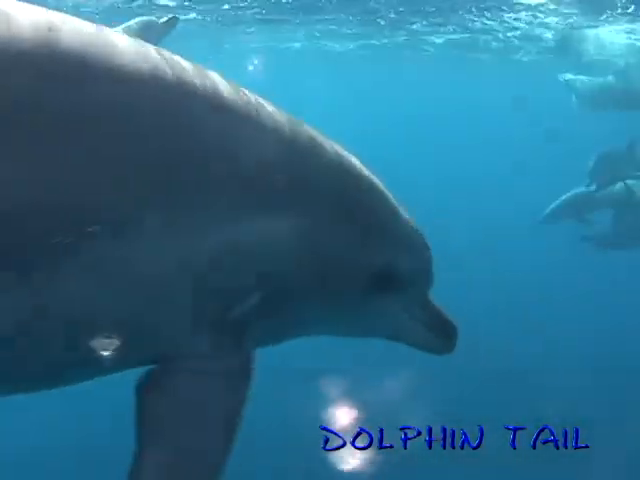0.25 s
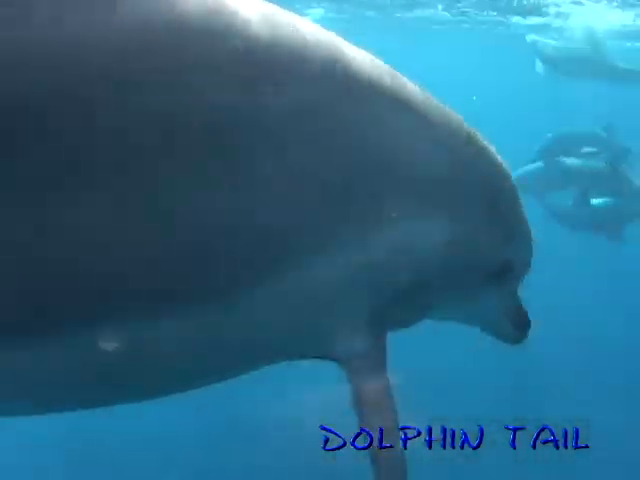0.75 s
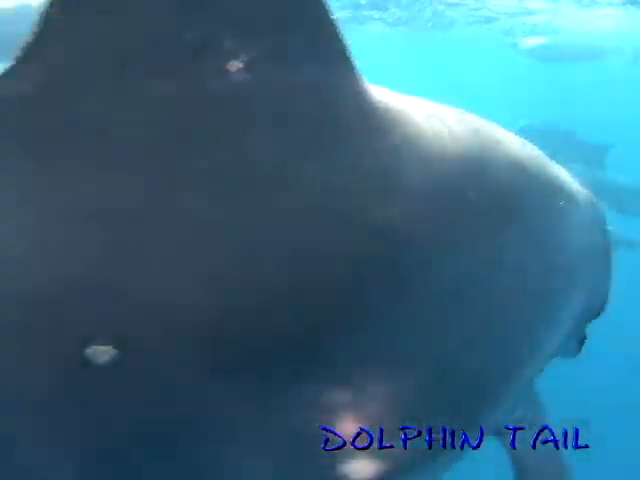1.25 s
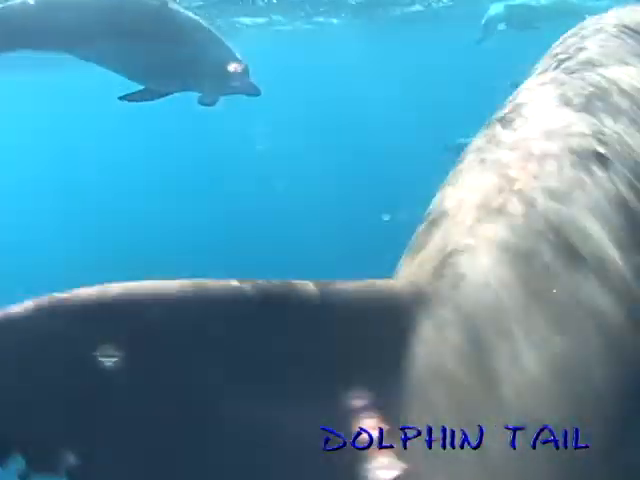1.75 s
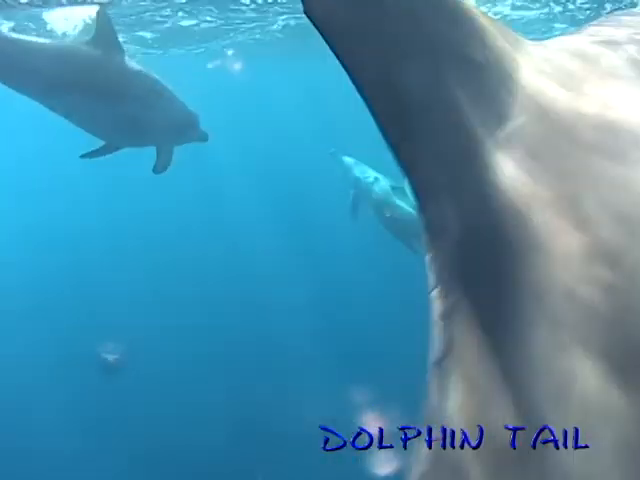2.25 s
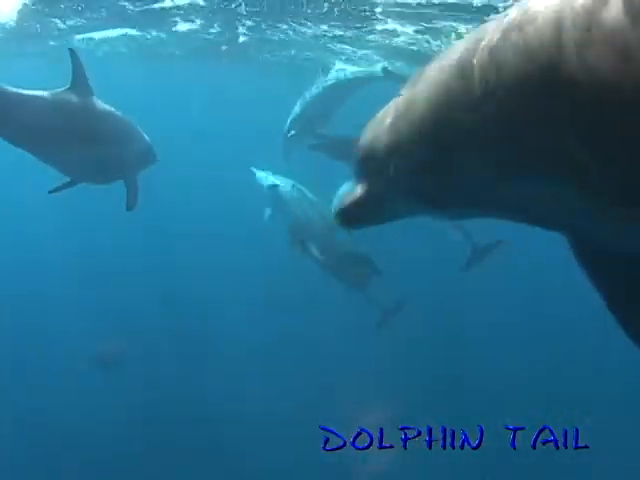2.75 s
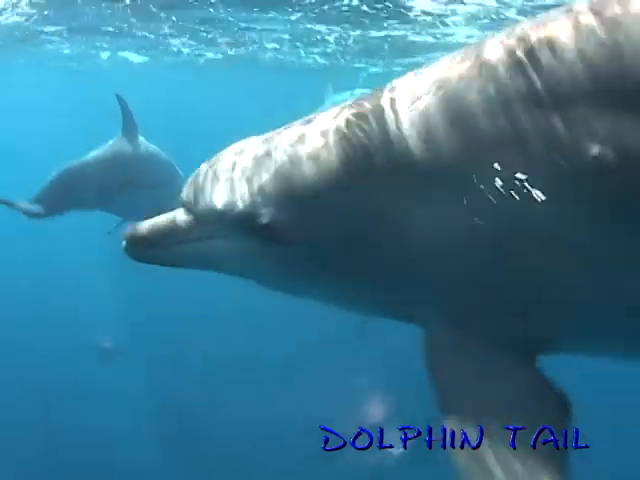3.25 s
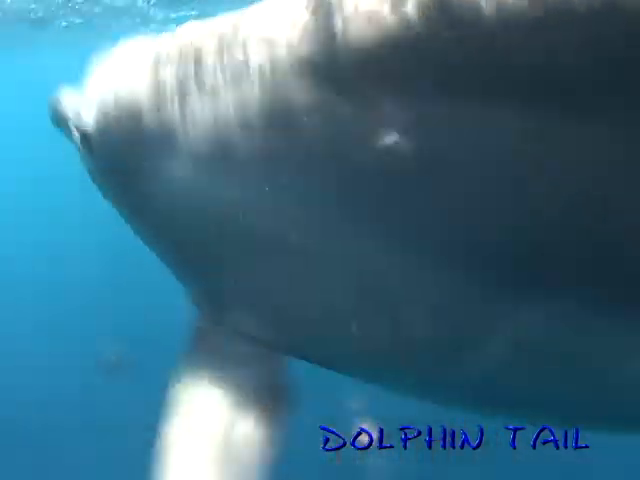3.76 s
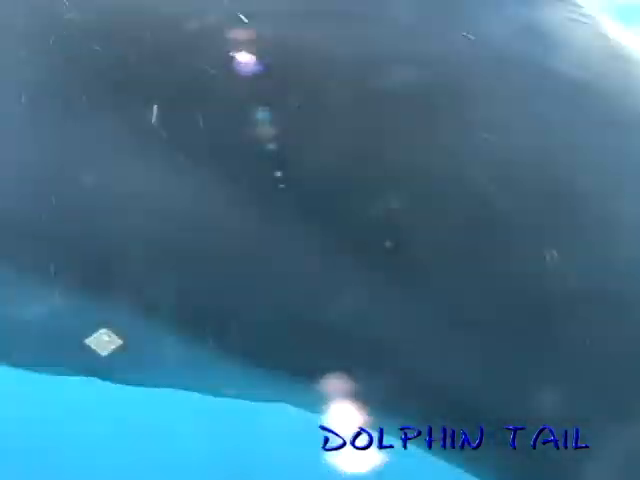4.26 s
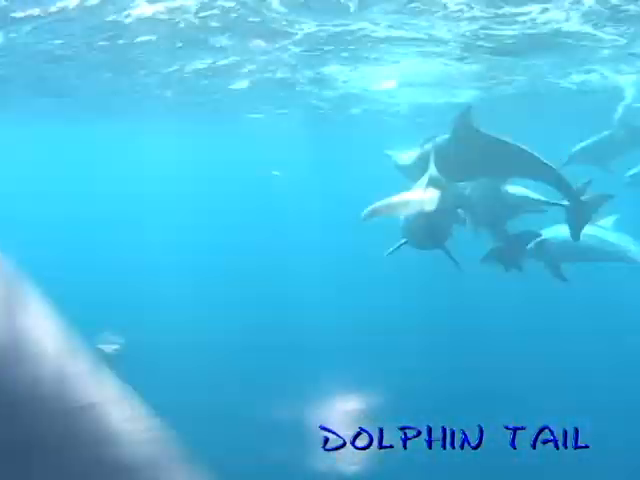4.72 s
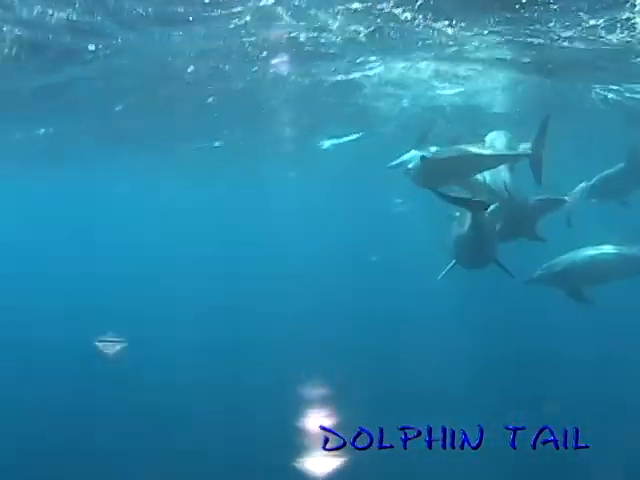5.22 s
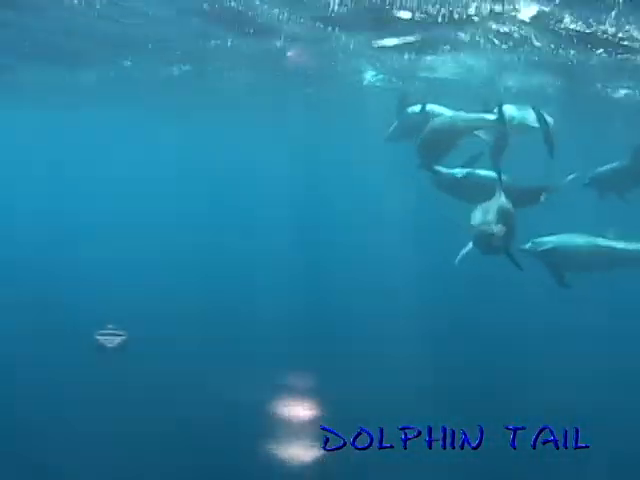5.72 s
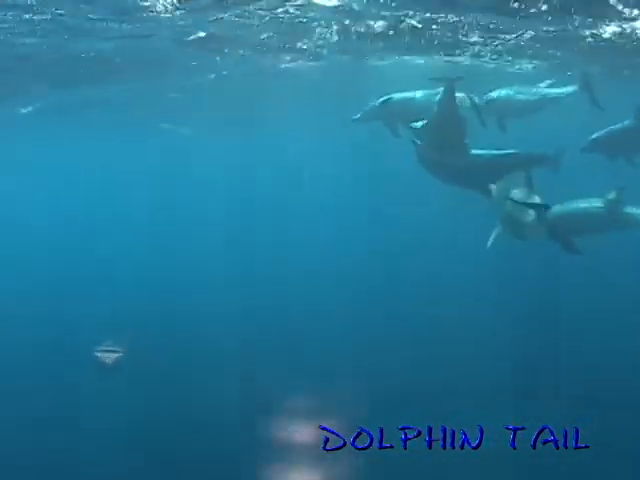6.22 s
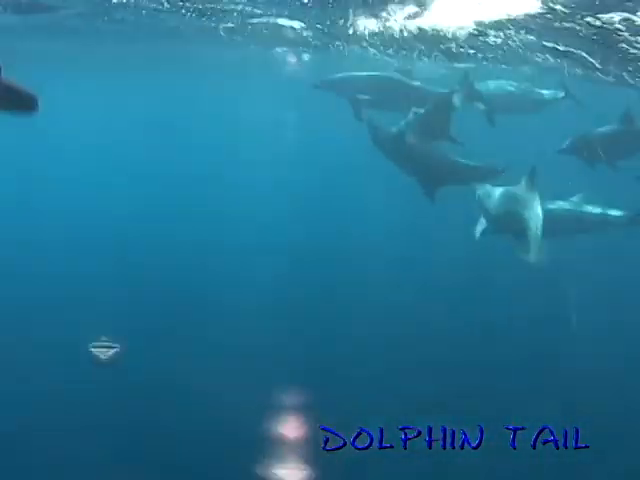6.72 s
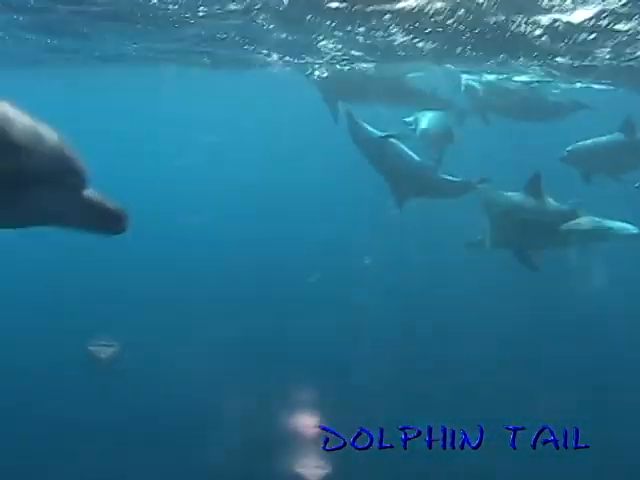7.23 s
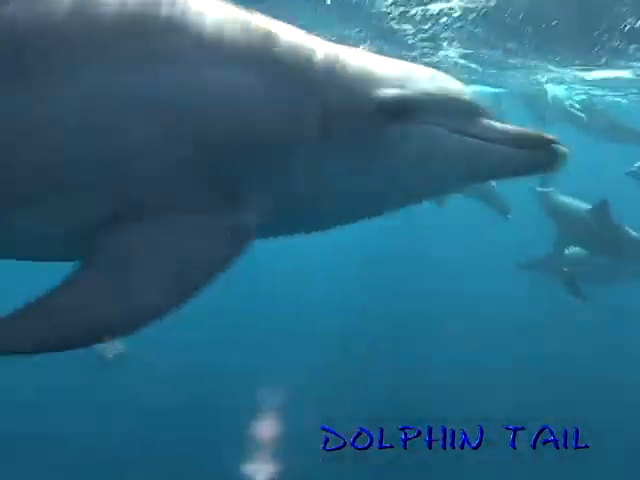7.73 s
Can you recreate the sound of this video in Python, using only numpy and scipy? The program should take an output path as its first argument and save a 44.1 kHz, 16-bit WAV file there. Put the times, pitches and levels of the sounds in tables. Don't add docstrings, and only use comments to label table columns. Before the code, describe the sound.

High looping dolphin whistles swoop up and down through hissing sea water, joined by sonar clicks, bubble pops, dull knocks and a brief squawking cluster.

```python
import sys
import numpy as np
from scipy import signal
from scipy.fft import rfft, irfft
from scipy.io import wavfile
from scipy.ndimage import uniform_filter1d

SR = 44100
rng = np.random.default_rng(int(sys.argv[2]) if len(sys.argv) > 2 else 0)


def to_wav(s):
    ch = np.atleast_2d(s).T
    pcm = np.round(np.clip(ch, -1, 1) * 32767)
    wavfile.write(sys.argv[1], SR, pcm.astype(np.int16))


def voltage_ratio(decibels):
    exponent = np.asarray(decibels, float) / 20
    return 10 ** exponent


N = 351915

# (frequency [Hz], gain [dB])
WALL_LEFT = [(3960, 5.5), (4440, 4.5), (5280, -16.5), (5640, -4), (6360, -7), (7200, -7), (7800, -17),
             (8040, -16.5), (8880, -23.5), (9600, -19), (11760, -36.5), (14760, -36.5), (15600, -44),
             (15720, -31)]
WALL_RIGHT = [(3960, -2.5), (4200, 0), (4920, -13), (5520, -9.5), (5880, -7.5), (6600, -9.5), (8040, -15),
              (8760, -29), (10560, -27.5), (13080, -40), (14760, -31), (15480, -47), (15600, -53),
              (15720, -30)]
# (frequency [Hz], left over right [dB])
BALANCE_DB = [(60, 12.5), (110, -2.5), (200, 1), (380, -0.5), (700, -0.5), (1290, -5.5), (2380, -1.5),
              (4400, -0.5), (8120, -1.5), (15000, 1)]
# (time [s], hold [s], hollow rush level [dB], broad wash level [dB], release [dB/s])
WAKES = [
    (0, 0.046, -43, -39.5, 16.5),
    (2.126, 0.16, -43.5, -38.5, 20.5),
    (3.31, 0.83, -57.5, -41.5, 11),
    (4.326, 0.98, -50.5, -40.5, 33),
    (6.293, 0.29, -54, -38, 21),
    (7.474, 0.1, -50, -33, 41),
]
# (breathy halo [dB], surface echo delay [ms], echo level [dB])
FALL_PATH = (-7, 1.8, -10)


def rms_one(x):
    return x / np.sqrt(np.mean(x ** 2) + 1e-20)


def span(s, length_s):
    at = np.arange(round(s * SR), min(round((s + length_s) * SR), N))
    return at, (at - at[0]) / SR


def in_time(rows):
    s, *columns = np.transpose(rows)
    at = np.arange(round(s[0] * SR), min(round(s[-1] * SR), N))
    return [at] + [np.interp(at / SR, s, c) for c in columns]


def at_hz(points, hz):
    points_hz, value = np.transpose(points)
    return np.interp(np.log(hz + 1), np.log(points_hz), value)


def drift(rate_hz):
    r = np.exp(-80 * np.pi * rate_hz / SR)
    white = rng.standard_normal(N // 40 + 2002)
    slow = signal.lfilter([1], [1, -2 * r, r * r], white)[2000:]
    return np.interp(np.arange(N) / 40, np.arange(len(slow)), rms_one(slow))


def resonate(x, hz, width_hz):
    r = np.exp(-np.pi * width_hz / SR)
    poles = [1, -2 * r * np.cos(2 * np.pi * hz / SR), r * r]
    return signal.lfilter([(1 - r * r) / 2, 0, (r * r - 1) / 2], poles, x)


def panned(x, pan_db):
    return x * voltage_ratio(np.array([[pan_db / 2], [-pan_db / 2]]))


def causal(db):
    cepstrum = irfft(db * np.log(10) / 20)
    cepstrum[1:len(db) - 1] *= 2
    cepstrum[len(db):] = 0
    return irfft(np.exp(rfft(cepstrum)))


def sea_colour_db(hz):
    # (frequency [Hz], density [dB/Hz])
    hiss = [(15, -61), (25, -34.5), (148, -21.5), (435, -2.5), (569, -8), (1030, -2), (1120, -5.5),
            (1540, -1.5), (2070, -4), (2720, -0.5), (3860, -9), (6100, -9.5), (8650, -7), (11000, -19.5),
            (15600, -22.5)]
    # (frequency [Hz], width [Hz], level over the hiss [dB])
    hollows = [(215, 270, 0.5), (572, 46, 9.5), (640, 110, 3.5), (700, 244, 6), (1000, 78, 3),
               (1540, 94, 5.5), (2480, 160, 1), (2840, 120, 5), (4410, 540, 4.5), (6100, 1130, 3.5),
               (9300, 2100, -11), (10730, 660, 8.5)]
    bumps = sum(db / (1 + (2 * (hz - centre_hz) / width_hz) ** 2) for centre_hz, width_hz, db in hollows)
    return at_hz(hiss, hz) + bumps


def pair():
    # (frequency [Hz], left-right correlation [-1 to 1])
    likeness = [(60, -1.95), (130, 0.48), (290, -0.29), (640, -0.84), (1410, 0.49), (3100, -0.093),
                (6820, 0.45), (15000, 0.059)]
    mid, side = rfft(rng.standard_normal((2, N)))
    hz = np.linspace(0, SR / 2, len(mid))
    sign = np.array([[1], [-1]])
    alike = np.clip(at_hz(likeness, hz), -1, 1)
    both = np.sqrt(1 + alike) * mid + np.sqrt(1 - alike) * side * sign
    return both * voltage_ratio(at_hz(BALANCE_DB, hz) / 2 * sign), hz


def sea(patchy_db):
    both, hz = pair()
    rib_hz = np.arange(0, SR / 2, 45)
    ribs_db = 2.6 * np.interp(hz, rib_hz, rng.standard_normal(len(rib_hz)))
    both = both * voltage_ratio(sea_colour_db(hz) + ribs_db)
    octave = np.log2(hz + 1)
    hiss = 0
    for k in range(4, 16):
        band = irfft(both * np.clip(1 - abs(octave - k), 0, 1), N)
        hiss = hiss + band * voltage_ratio(.3 * drift(18.0) + patchy_db * drift(19.0))
    return voltage_ratio(-42.5) * rms_one(hiss)


def motor():
    # (frequency [Hz], level [dB])
    partials = [(575, -61), (1721, -61), (3275, -76)]
    t = np.arange(N) / SR
    whine = sum(np.sqrt(2) * voltage_ratio(db) * np.sin(2 * np.pi * hz * t) for hz, db in partials)
    return panned(whine, -3.0)


def surge(calm_db, peaks_db, attack_s, releases):
    t = np.arange(0, N, 64) / SR
    power = voltage_ratio(2 * calm_db)
    for (s, hold_s, *_), db, release in zip(WAKES, peaks_db, releases):
        rise = np.clip((t - s) / attack_s + (s < attack_s), 0, 1)
        fall_db = release * np.maximum(t - s - hold_s, 0)
        power = power + rise ** 2 * voltage_ratio(2 * (db - fall_db))
    return np.interp(np.arange(N) / SR, t, np.sqrt(power))


def wake():
    # (frequency [Hz], width [Hz], level [dB])
    rush_modes = [(375, 90, -11), (627, 118, 2.5), (1022, 58, -4.5)]
    wash_modes = [(1148, 360, -1), (1556, 80, 5), (2334, 530, -3.5), (2740, 310, -9.5)]
    # (rush [dB], rumble [dB], wash [dB], fizz [dB])
    calm = (-63.5, -65, -70, -62.5)
    _, _, rush_db, wash_db, release = np.transpose(WAKES)
    lag = .71 * release
    attack_s, wash_attack_s = 0.021, 0.24

    white = irfft(pair()[0], N)
    swing = panned([np.roll(white[1], 9), white[1]], -5.5) + .4 * white
    rush = sum(voltage_ratio(db) * resonate(resonate(swing, hz, w), hz, 2 * w) for hz, w, db in rush_modes)
    rush = rush * voltage_ratio(1.0 * drift(30.0))
    wash = sum(voltage_ratio(db) * resonate(resonate(white, hz, w), hz, 2 * w) for hz, w, db in wash_modes)
    wash = wash * voltage_ratio(2.0 * drift(52.0))
    rumble = resonate(resonate(white, 102, 132), 172, 420) * voltage_ratio(2.0 * drift(21.0))
    fizz = resonate(resonate(white, 9460, 430), 11500, 1500)

    rush = rms_one(rush) * voltage_ratio(4.5) * surge(calm[0], rush_db, attack_s, release)
    rumble = rms_one(rumble) * voltage_ratio(8.0) * surge(calm[1], rush_db - 13.5, attack_s, release + 14)
    wash = rms_one(wash) * voltage_ratio(-5.0) * surge(calm[2], wash_db, wash_attack_s, lag)
    fizz = rms_one(fizz) * surge(calm[3], wash_db - 21, attack_s, lag)
    return rush + rumble + wash + fizz


def knocks(table, sag, lead, spread):
    out = np.zeros((2, N))
    chance = rng.standard_normal((len(table), 2))
    side = np.array([[.5], [-.5]])
    for (s, db, hz, t60), (turn, detune) in zip(table, chance):
        start = round(s * SR)
        t = np.arange(min(round(t60 * SR), N - start)) / SR
        pitch = 1 + sag * np.exp(-t * hz) + 0.051 * detune * side
        phase = 2 * np.pi * hz * t * pitch + (lead + spread * turn) * side
        decay = voltage_ratio(db - 60 * t / t60) * np.minimum(t / 0.0012, 1)
        ring = np.sin(phase) * decay / np.cos(lead / 2)
        out[:, start:start + len(t)] += panned(ring, at_hz(BALANCE_DB, hz))
    return signal.sosfilt(signal.butter(2, 110, "high", fs=SR, output="sos"), out)


def bubbles():
    # (time [s], peak level [dB], frequency [Hz], t60 [s])
    bubble_rings = [(0.001, -25, 1830, 0.049), (0.058, -30, 600, 0.035), (2.037, -32, 576, 0.07),
                    (2.631, -31, 980, 0.027), (2.825, -25.5, 1700, 0.051), (2.833, -20, 1790, 0.04),
                    (3.248, -29, 1190, 0.04), (3.287, -35, 1370, 0.04), (3.504, -29, 1530, 0.029),
                    (3.608, -22, 887, 0.031), (3.687, -29, 1660, 0.056), (3.856, -27, 719, 0.1),
                    (3.903, -21, 1030, 0.028), (4.005, -29, 1530, 0.04), (4.054, -24, 1025, 0.067),
                    (4.14, -29, 717, 0.12), (4.151, -26, 1960, 0.054), (4.182, -24, 578, 0.17),
                    (4.367, -21, 1800, 0.03), (5.386, -24, 2630, 0.021), (5.459, -29, 1480, 0.052),
                    (5.929, -36.5, 1350, 0.089), (6.013, -23, 1265, 0.04), (6.476, -18.5, 2400, 0.033),
                    (6.597, -26, 750, 0.071), (6.765, -31, 689, 0.074), (7.084, -28.5, 1590, 0.044),
                    (0.259, -32, 654, .05), (0.329, -33, 641, .05), (0.916, -33, 1620, .04),
                    (2.192, -29, 616, .06), (2.231, -32, 611, .05), (2.408, -32, 616, .05),
                    (2.593, -35, 592, .05), (3.895, -28, 620, .05), (3.908, -28, 800, .05),
                    (4.03, -31, 730, .09), (4.045, -31, 2650, .04), (4.18, -30, 1100, .06),
                    (4.235, -32, 740, .06), (4.335, -32, 700, .07), (4.37, -31, 650, .09),
                    (4.41, -31, 640, .06), (4.44, -33, 580, .08), (4.547, -31, 1550, .04),
                    (5.061, -30, 630, .05), (5.639, -32, 1610, .04), (6.73, -34, 900, .04),
                    (7.612, -30, 1680, .06), (7.645, -32, 1600, .08),
                    (2.785, -27, 4700, .012),
        (2.824, -19.5, 2700, 0.021),
        (3.608, -22, 1450, .02),
        (3.912, -20, 4270, 0.017),
        (3.962, -22.5, 4030, 0.12),
        (3.6, -29, 2500, .03),
        (4.074, -28, 2270, .05),
        (6.476, -28, 1574, 0.098),
    ]
    return knocks(bubble_rings, sag=.03, lead=0, spread=.9)


def thumps():
    # (time [s], peak level [dB], frequency [Hz], t60 [s])
    blows = [(0.21, -23, 214, 0.077), (1.55, -41, 230, 0.094), (1.85, -45, 100, .15),
             (2.043, -37, 270, 0.066), (2.25, -41, 110, .2), (2.34, -42, 95, .2), (3.1, -42, 192, 0.068),
             (3.608, -21, 195, 0.038), (4.295, -40.5, 215, 0.16), (4.425, -37.5, 134, .15),
             (4.556, -34, 134, 0.075), (5.635, -39, 262, 0.057), (6.245, -30, 230, 0.045),
             (6.504, -40.5, 394, 0.11), (6.59, -35, 373, 0.046), (7.06, -29, 215, 0.072),
             (7.483, -31, 205, 0.14), (7.518, -31.5, 125, 0.11)]
    return knocks(blows, sag=.3, lead=1.9, spread=.3)


def sonar():
    # (time [s], peak level [dB])
    clicks = [(0.3316, -38.5), (0.6185, -35), (0.6304, -36), (1.5394, -42), (1.598, -46), (1.8602, -42),
              (2.0333, -42), (2.135, -44), (2.6713, -42), (2.4968, -41), (2.7865, -38.5), (3.5887, -41),
              (3.7567, -34.5), (3.07, -43), (4.172, -42), (4.4069, -39.5), (4.574, -44), (5.063, -41),
              (5.385, -40), (6.012, -41), (6.474, -39), (3.249, -42), (5.2324, -36), (5.5444, -44),
              (5.8758, -36), (5.959, -46), (6.2143, -42), (6.2447, -41), (6.3084, -40.5), (6.5058, -40),
              (6.536, -42), (6.576, -45), (6.592, -43), (6.666, -45), (7.1247, -42), (7.4614, -34.5)]
    # (time [s], length [s], rate [clicks/s], peak level [dB])
    trains = [
        (0.598, .15, 88, -35.5),
        (2.298, 0.37, 86, -40),
        (4.101, .15, 140, -36),
        (5.382, .07, 82, -34),
        (5.599, .35, 55, -38),
        (7.118, 0.22, 136, -34),
    ]
    spikes = np.zeros(N)
    for s, db in clicks:
        spikes[round(s * SR)] = voltage_ratio(db + 12.0)

    uneven = voltage_ratio(1.1 * rng.standard_normal(N))
    pace = voltage_ratio(0.82 * drift(30.0))
    for s, length_s, per_s, db in trains:
        at, t = span(s, length_s)
        later = t / length_s - .5
        rate = per_s * (1 - .2 * later)
        level_db = db - 2 * later
        fired = np.diff(np.floor(np.cumsum(rate * pace[at]) / SR), prepend=0) > 0
        spikes[at] += fired * voltage_ratio(level_db) * uneven[at]

    crackle = rng.random(N) < 200.0 / SR
    spikes += crackle * voltage_ratio(-44.5 + 3.7 * np.minimum(rng.exponential(1, N), 2))

    smear = rng.standard_normal(200) * voltage_ratio(-60 * np.arange(200) / SR / 0.013)
    smear[0] = 4.8
    spikes = np.convolve(spikes, smear / 3.23)[:N]

    hz = np.linspace(0, SR / 2, 2049)
    tilt_db = 4.0 * np.log2(np.minimum(hz + 1, 6000) / 4000) - 5.0 * (hz / 12000) ** 2
    colour = sea_colour_db(hz) + tilt_db
    shapes = [causal(colour + side * at_hz(BALANCE_DB, hz) / 2) for side in (1, -1)]
    peak = np.abs(shapes).max()
    return np.array([signal.fftconvolve(spikes, shape / peak)[:N] for shape in shapes])


def upsweeps():
    # (time [s], frequency [Hz])
    rises = [
        [(0.5, 5040), (0.554, 5510), (0.59, 6070), (0.614, 6740), (0.632, 7560), (0.662, 8610), (0.674, 8660),
         (0.686, 9580), (0.737, 11020)],
        [(1.146, 4160), (1.155, 4740), (1.212, 5450), (1.242, 5680), (1.29, 6480), (1.308, 7320), (1.314, 7450),
         (1.341, 10210), (1.407, 15000)],
        [(2.16, 5150), (2.2, 5200), (2.231, 5950), (2.234, 6600), (2.243, 7250), (2.262, 7950), (2.307, 8140),
         (2.463, 14900), (2.499, 15650)],
        [(2.786, 4520), (2.798, 5400), (2.84, 5810), (2.873, 6270), (2.912, 7020), (2.984, 10660),
         (3.053, 14470), (3.1, 15350), (3.158, 15650)],
        [(3.937, 4600), (3.965, 4200), (3.989, 4440), (4.07, 6090), (4.124, 7710), (4.169, 10140),
         (4.223, 12170), (4.33, 15050), (4.373, 15550)],
        [(4.597, 5450), (4.68, 6230), (4.683, 5870), (4.735, 6680), (4.748, 7400), (4.762, 7520),
         (4.816, 10290), (4.93, 14100), (5.008, 14900)],
        [(5.23, 4540), (5.257, 5210), (5.266, 5560), (5.314, 6700), (5.374, 7920), (5.401, 8810),
         (5.449, 11560), (5.548, 14410), (5.65, 14900)],
        [(6.935, 4370), (7.007, 5100), (7.019, 5470), (7.055, 5990), (7.1, 7020), (7.118, 8050), (7.16, 10500),
         (7.22, 13400), (7.277, 15200)],
        [(7.555, 5920), (7.558, 5750), (7.576, 5580), (7.6, 5640), (7.627, 6070), (7.672, 7240), (7.729, 10270),
         (7.768, 13240), (7.828, 15650)],
    ]
    # (time [s], level [dB])
    efforts = [
        [(0.5, -41), (0.572, -23), (0.584, -32), (0.593, -24), (0.617, -37), (0.623, -28), (0.68, -50),
         (0.686, -37), (0.737, -56)],
        [(1.146, -49), (1.161, -35), (1.191, -42), (1.233, -30), (1.278, -26), (1.305, -39), (1.314, -32),
         (1.362, -56), (1.407, -66)],
        [(2.16, -51), (2.172, -45), (2.214, -41), (2.235, -29), (2.241, -38), (2.292, -42), (2.295, -36),
         (2.316, -48), (2.499, -70)],
        [(2.786, -27), (2.837, -13), (2.876, -14), (2.891, -20), (2.921, -17), (2.945, -38), (2.957, -28),
         (3.01, -46), (3.158, -70)],
        [(3.935, -50), (3.975, -27), (4.04, -35), (4.067, -20), (4.082, -30), (4.122, -41), (4.132, -31),
         (4.2, -48), (4.373, -58)],
        [(4.597, -46), (4.657, -24), (4.678, -31), (4.686, -23), (4.703, -30), (4.741, -20), (4.771, -35),
         (4.879, -58), (5.008, -62)],
        [(5.23, -39), (5.239, -33), (5.254, -39), (5.299, -33), (5.308, -27), (5.341, -28), (5.359, -40),
         (5.506, -65), (5.65, -72)],
        [(6.935, -52), (6.947, -33), (7.01, -37), (7.088, -23), (7.109, -42), (7.124, -30), (7.13, -43),
         (7.16, -56), (7.277, -65)],
        [(7.555, -42), (7.57, -38), (7.591, -29), (7.615, -29), (7.63, -24), (7.645, -29), (7.669, -29),
         (7.681, -43), (7.828, -66)],
    ]
    # (breathy halo [dB], surface echo delay [ms], echo level [dB])
    paths = [
        (-26, 5.5, -17),
        (-23, 7.7, -12.5),
        (-15, 13, -8),
        (-31, 5.4, -32),
        (-20, 39, -32),
        (-19, 4.1, -19),
        (-18, 1, -23),
        (-20, 3, -14),
        (-18, 23, -26),
    ]
    for rows, effort, path in zip(rises, efforts, paths):
        at, hz = in_time(rows)
        wall_power = (voltage_ratio(2 * at_hz(WALL_LEFT, hz)) + voltage_ratio(2 * at_hz(WALL_RIGHT, hz))) / 2
        s, db = np.transpose(effort)
        inside_db = 40 * np.log10(np.interp(at / SR, s, voltage_ratio(db / 2)))
        yield at, hz, inside_db - 10 * np.log10(wall_power), path


def dropout(hz, centre_hz, depth_db, width_hz):
    return -depth_db * np.exp(-((hz - centre_hz) / width_hz) ** 2)


def downsweeps():
    # (crest time [s], crest frequency [Hz], end time [s], end frequency [Hz], level [dB])
    falls = [
        (.87, 16600, 1.06, 4360, -21.5),
        (1.46, 16100, 1.645, 6220, -20),
        (2.5, 15300, 2.69, 8150, -14.5),
        (3.16, 15900, 3.36, 11100, -10),
        (4.372, 15550, 4.525, 8300, -25),
        (5.01, 14800, 5.15, 7530, -27),
        (7.33, 18600, 7.485, 5430, -17.5),
    ]
    loudest = [9500, 8200, 9600, 12400, 15000, 14500, 7950]
    # (frequency [Hz], depth [dB], width [Hz])
    dips = [(6200, 18, 1100), (6800, 15, 500), (8900, 8, 300), (6800, 15, 500), (6800, 15, 500),
            (6800, 15, 500), (6800, 15, 500)]
    for (s, crest_hz, end_s, end_hz, db), loudest_hz, dip in zip(falls, loudest, dips):
        at, t = span(s, end_s - s)
        done = t / (end_s - s)
        hz = crest_hz - (crest_hz - end_hz) * done ** 2.6
        off_db = 13 * abs(np.log2(hz / loudest_hz))
        release_db = 2 * np.clip(1 - (t[-1] - t) / .012, 0, 1)
        yield at, hz, db - off_db - release_db + dropout(hz, *dip), FALL_PATH


def lead_in_chirp():
    # (start [s], end [s], start frequency [Hz], end frequency [Hz], level [dB])
    bend = (7.538, 7.554, 4400, 4750, -31)
    s, end_s, start_hz, end_hz, db = bend
    at, t = span(s, end_s - s)
    done = t / t[-1]
    hz = start_hz + (end_hz - start_hz) * done ** 2
    swell_db = 10 * np.log10(np.sin(np.pi * done) ** 2 + .05)
    yield at, hz, db + swell_db, FALL_PATH


def whistles():
    out = np.zeros(N + SR)
    waver = 26.0 * drift(35.0)
    flutter = np.clip(drift(60.0), -3, 1.5)
    breath = rng.standard_normal(N)
    halo = rms_one(resonate(resonate(breath, 350, 700), 350, 700))
    glint = voltage_ratio(2.0 * drift(25.0))
    calls = [*upsweeps(), *lead_in_chirp(), *downsweeps()]
    for at, hz, db, (halo_db, echo_ms, echo_db) in calls:
        pitch = uniform_filter1d(hz, size=130, mode="nearest") + waver[at] * np.clip(hz / 3000 - 1, 1, 2)
        phase = 2 * np.pi * np.cumsum(pitch) / SR
        ends = np.clip(np.minimum(at - at[0], at[-1] - at) / (0.00067 * SR), 0, 1)
        beads_db = .7 + 5.0 * np.clip((hz - 7000) / 2000, 0, 1)
        octave_db = -4 - 14 * np.log2(hz / 5000) + 4.0 * flutter[at - 900]
        octave = voltage_ratio(octave_db) * np.sin(2 * phase) * (hz < SR / 5)
        strength = voltage_ratio(beads_db * flutter[at]) + voltage_ratio(halo_db) * halo[at]
        call = np.sqrt(2) * voltage_ratio(db) * ends * strength * (np.sin(phase) + octave)
        out[at] += call
        out[at + round(echo_ms * SR / 1000)] += voltage_ratio(echo_db) * glint[at] * call
    return out[:N]


def through_walls(x):
    echo_db, t60_s = -27, .05
    hz = np.linspace(0, SR / 2, 2049)
    t = np.arange(4096) / SR
    scatter = voltage_ratio(echo_db - 60 * t / t60_s) * rng.standard_normal((2, 4096)) / np.sqrt(t60_s * SR / 14)
    scatter[:, 0] = 1
    walls = [np.convolve(causal(at_hz(wall, hz)), s) for wall, s in zip((WALL_LEFT, WALL_RIGHT), scatter)]
    return np.array([signal.fftconvolve(x, wall)[:N] for wall in walls])


def squawks():
    # (time [s], length [s], rate [pulses/s], level [dB], roughness [0-1])
    throats = [
        (1780, [(2.825, 0.081, 510, -36, 0.2)]),
        (2000, [(4.135, 0.1, 340, -39, .5), (4.2, .17, 362, -37, .02), (4.355, 0.072, 350, -41, .45)]),
        (990, [(2.835, .065, 516, -39.5, 0.23), (4.02, 0.11, 330, -41.5, 0.6)]),
        (370, [(3.855, 0.037, 355, -39, 0), (3.89, 0.082, 380, -38, 0.2), (4.05, .07, 315, -41.5, 0.16), (4.18, 0.13, 330, -38, 0.17), (4.3, 0.19, 350, -43.5, 0.13)]),
    ]
    out = np.zeros(N)
    for throat_hz, (s, length_s, per_s, db, rough) in [(hz, row) for hz, rows in throats for row in rows]:
        at, t = span(s, length_s)
        level_db = db - 27 * t * (2000 / throat_hz) ** 0.99
        jitter = uniform_filter1d(rng.standard_normal(len(at)), size=150) * np.sqrt(150)
        droop = 0.11 * (t / length_s) ** 7
        cycle = np.cumsum(per_s * (1 + .3 * rough * jitter - droop)) / SR
        strong_weak = 1 + voltage_ratio(-12) * (2 * (cycle % 2 > 1) - 1)
        noisy = 1 + 2.2 * rough * rng.standard_normal(len(at))
        source = np.exp(-30.0 * (cycle % 1)) * strong_weak * noisy
        width_hz = min(540, .7 * throat_hz)
        voice = resonate(resonate(source, throat_hz, width_hz), throat_hz, 2 * width_hz)
        out[at] += voltage_ratio(level_db) * rms_one(voice) * signal.windows.tukey(len(at), .25)
    return panned(out, -5)


def scene():
    water = sea(patchy_db=1.9) + wake()
    blows = bubbles() + thumps()
    animals = sonar() + through_walls(whistles()) + squawks()
    return water + motor() + blows + animals


def low_pass(x):
    return signal.sosfilt(signal.butter(12, 15800, fs=SR, output="sos"), x)


def record(dry):
    thin = signal.sosfilt(signal.butter(1, 70, "high", fs=SR, output="sos"), dry)
    thin = signal.sosfilt(signal.cheby2(16, 70, 16150, fs=SR, output="sos"), thin)
    return low_pass(thin)


dry = scene()
out = record(dry)
to_wav(out)
```